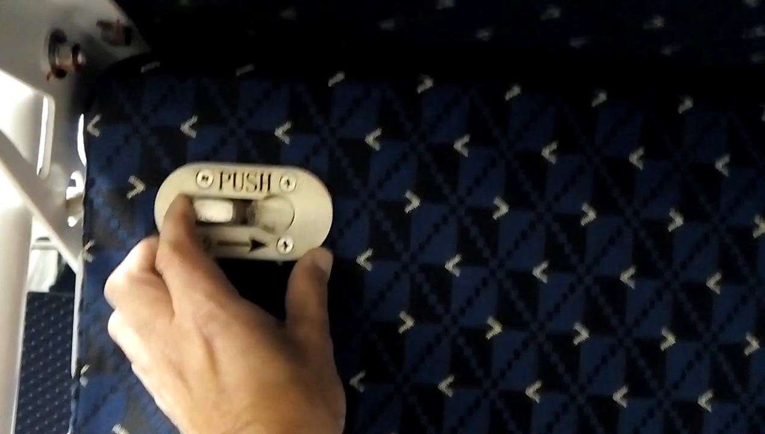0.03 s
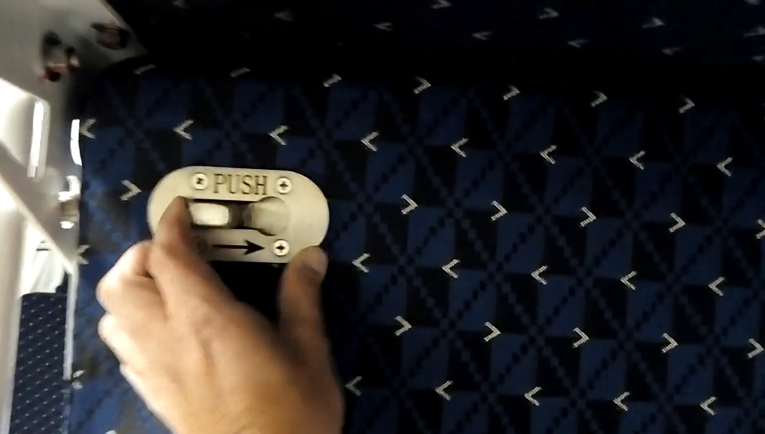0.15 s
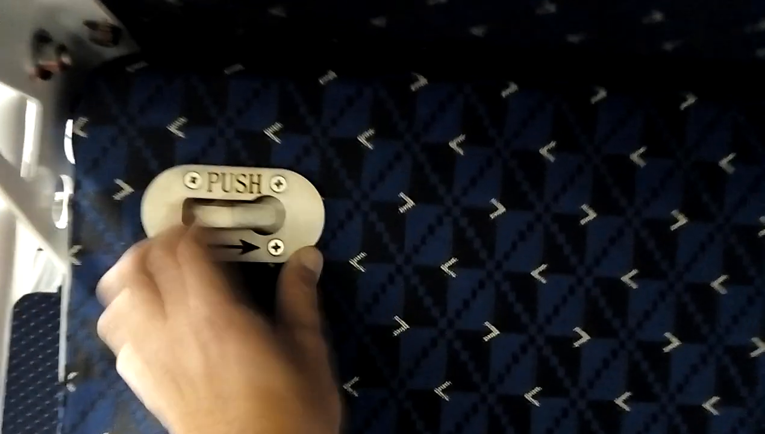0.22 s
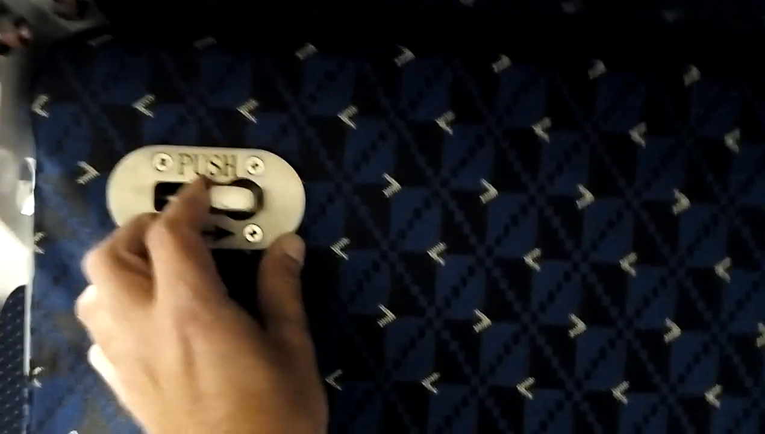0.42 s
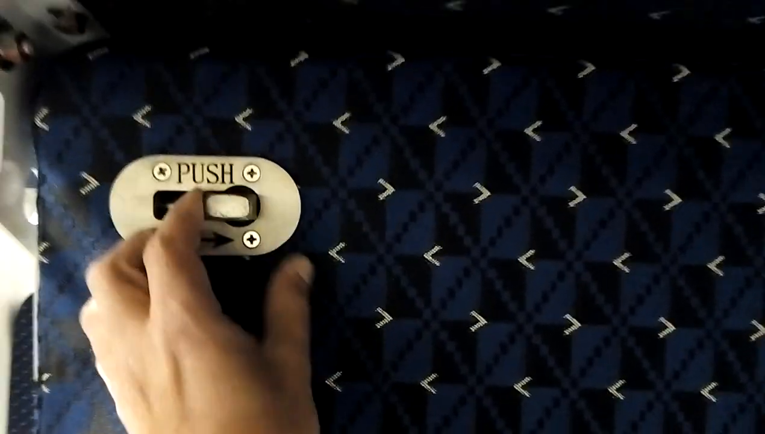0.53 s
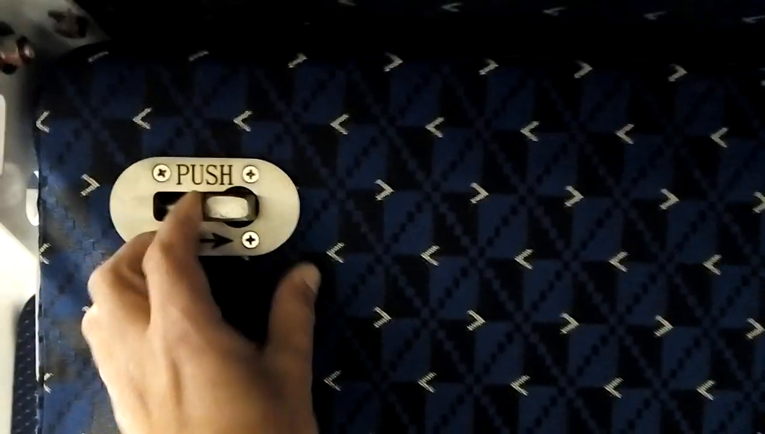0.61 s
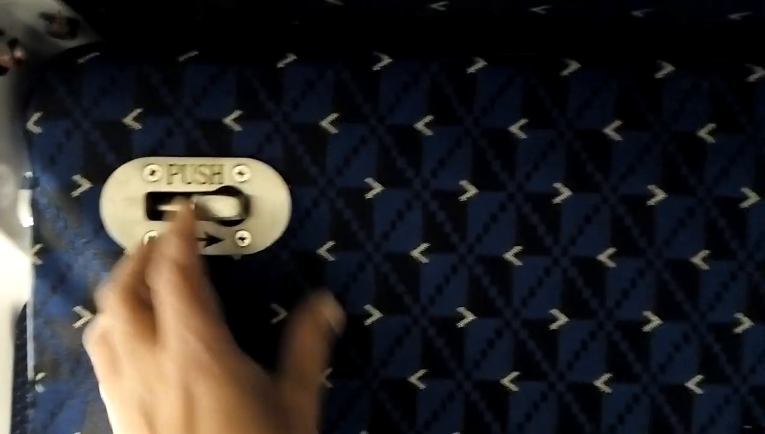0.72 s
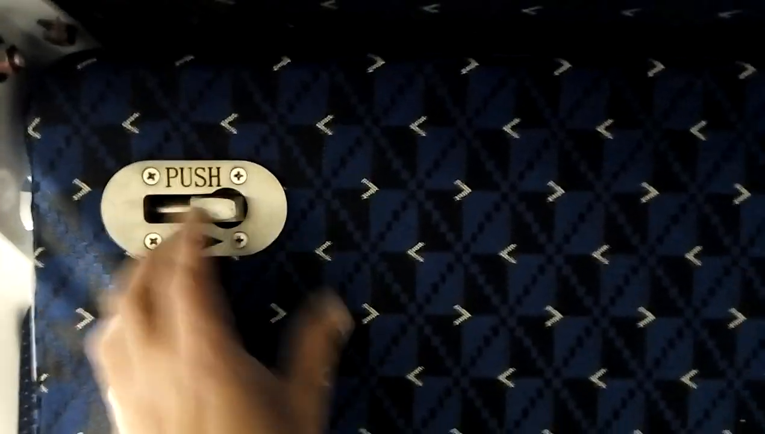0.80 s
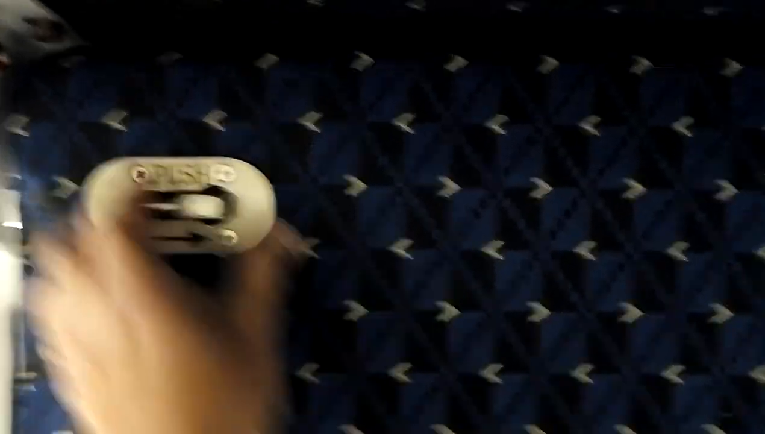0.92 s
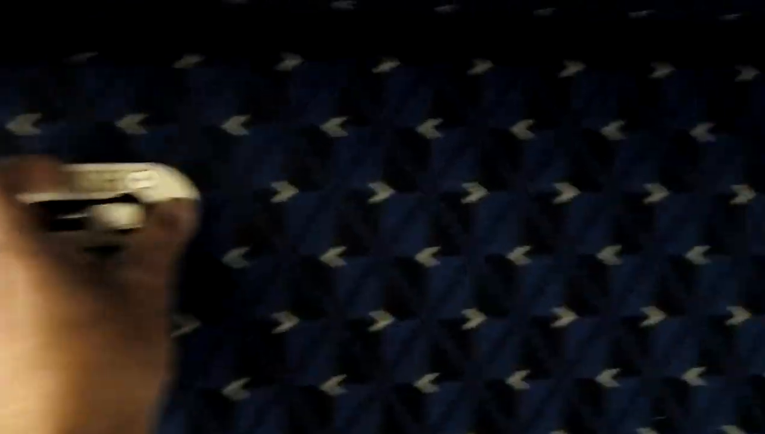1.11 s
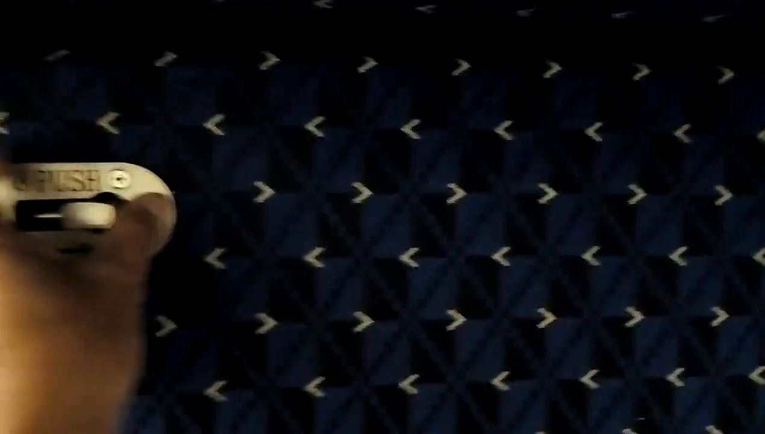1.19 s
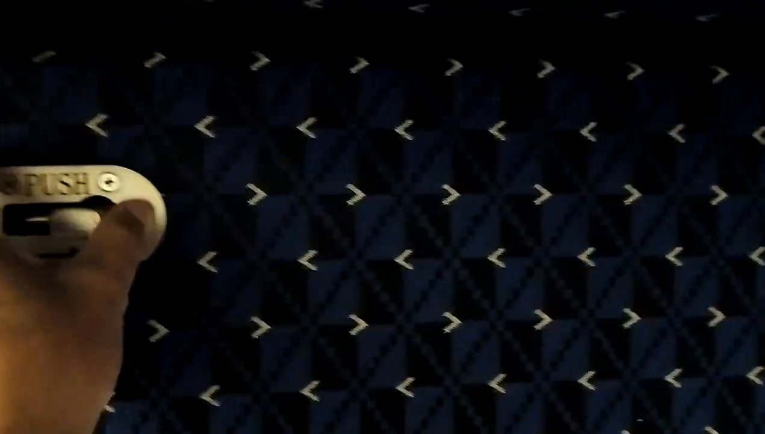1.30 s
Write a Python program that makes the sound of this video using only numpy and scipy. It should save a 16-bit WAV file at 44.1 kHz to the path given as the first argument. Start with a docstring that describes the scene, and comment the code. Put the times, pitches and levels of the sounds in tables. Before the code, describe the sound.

A table latch clacks sharply twice, close to the microphone, after a brief scrape. Faint finger rubbing leads to a softer clatter with a low thud and thin squeak, then one last click. The train carriage's ventilation hums faintly throughout.

```python
"""Ventilation hums faintly in a train carriage from start to end. A hand slides the latch of a fold-down
plastic table on a seat: the bolt scrapes, then snaps over at about 0.24 s with a double clack that rings
the table and shakes the seat, and settles. Fingers brush softly over the latch plate and the fabric.
From about 0.9 s a softer, diffuse clatter with a low thud and a thin squeak sounds in the carriage.
Near the end, at about 1.3 s, the latch clicks once more."""
import sys
import numpy as np
from scipy import signal
from scipy.fft import rfft, irfft, next_fast_len
from scipy.io import wavfile
from scipy.ndimage import map_coordinates

SR = 44100
rng = np.random.default_rng(int(sys.argv[2]) if len(sys.argv) > 2 else 0)


def materialize(psi):
    """Save the field psi as 16-bit PCM at rate SR to the path in sys.argv[1].

    A 1-D psi becomes a single channel; in a 2-D psi each row is a channel.
    """
    bounded = np.clip(np.atleast_2d(psi).T, -1, 1)
    quanta = np.round(bounded * 32767).astype(np.int16)
    wavfile.write(sys.argv[1], SR, quanta)


N = 59535  # 1.35 seconds


def amp(db):
    """Turn decibels into a number to multiply by."""
    return 10 ** (np.asarray(db) / 20)


def unit_rms(x):
    """Scale a lasting sound so that its average power is 1."""
    return x / np.sqrt(np.mean(x ** 2) + 1e-20)


def unit_energy(x):
    """Scale a short sound so that its total energy is 1."""
    return x / np.sqrt(np.sum(x ** 2) + 1e-20)


def read_curve(points, hz):
    """Read between (Hz, value) points, giving every octave the same room."""
    pitches, values = np.transpose(points)
    return np.interp(np.log(hz + 1), np.log(pitches + 1), values)


def clock():
    """The time of every sample, in seconds."""
    return np.arange(N) / SR


def fade(fade_s):
    """Die away. A fade time, here and below, is how long a sound takes to drop by 60 dB."""
    return np.exp(-np.log(1000) * clock() / fade_s)


def swell(rise_s):
    """A soft start that climbs from 0 towards 1."""
    return 1 - np.exp(-clock() / rise_s)


def at(start_s, x):
    """Delay a sound so that it begins at start_s."""
    return np.pad(x, (max(round(start_s * SR), 0), 0))[:N]


def wobble(per_second):
    """A smooth curve through this many random values a second."""
    return map_coordinates(rng.standard_normal(int(N * per_second / SR) + 4), [clock() * per_second])


def colour(x, points, low_hz=1, high_hz=SR):
    """Make some pitches louder than others by (Hz, dB) points, and soften those outside the two edges."""
    size = 2 * next_fast_len(N)
    hz = np.fft.rfftfreq(size, 1 / SR)
    edge_loss = np.sqrt((1 + (low_hz / (hz + 1)) ** 6) * (1 + (hz / high_hz) ** 6))
    gain = amp(read_curve(points, hz)) / edge_loss
    # Folding the cepstrum onto its first half keeps the filter from sounding before it is struck.
    cepstrum = irfft(np.log(np.maximum(gain, 1e-6)), size)
    cepstrum[1:size // 2] *= 2
    cepstrum[size // 2 + 1:] = 0
    return irfft(rfft(x, size) * np.exp(rfft(cepstrum)), size)[:N]


def noise(points):
    """Noise coloured by (Hz, dB) points, with an average power of 1."""
    return unit_rms(colour(rng.standard_normal(N), points))


def level(points):
    """A volume that follows (seconds, dB) points and is silent before and after them."""
    times, db = np.transpose(points)
    return amp(np.interp(clock(), times, db, left=-120, right=-120))


def ringing_tone(hz, fade_s):
    """One pure tone of a struck object, dying away."""
    return np.sin(2 * np.pi * (hz * clock() + rng.random())) * fade(fade_s)


# The colour of the moving air. Each row: frequency in Hz, relative level in dB.
AIR_COLOUR = [(15, -73), (25, -48), (103, -15), (167, -17.5), (202, -8), (257, -12.5), (293, -15.5),
              (558, -15), (604, -10.5), (811, -16.5), (1000, -18), (1090, -7.5), (1540, -2.5), (1760, -8.5),
              (2240, -6.5), (5570, -15.5), (8320, -44), (13500, -38.5), (15000, -34)]
# The tones of the fan. Each row: pitch in Hz, relative level in dB.
FAN_TONES = [(597.5, -82), (1055, -78), (1448, -76.5), (1577, -70)]
def ventilation(air_db=-59.5, waver_db=0.35, duct_db=-6.5, fan_trim_db=-1.5, drift_radians=1.3):
    """Air rushes steadily and rings faintly in its duct, while the fan's tones waver."""
    air = noise(AIR_COLOUR)
    duct_echo = unit_energy(rng.standard_normal(N) * fade(0.11))
    air_in_duct = irfft(rfft(air) * rfft(duct_echo), N)
    rush = unit_rms(air + amp(duct_db) * air_in_duct)
    fan = np.zeros(N)
    for hz, db in FAN_TONES:
        phase = 2 * np.pi * hz * clock() + drift_radians * wobble(13.63)
        fan += amp(db) * np.sqrt(2) * np.sin(phase)
    return amp(air_db + waver_db * wobble(16)) * rush + amp(fan_trim_db) * fan


# How loud the fingers brush. Each row: time in seconds, level in dB.
BRUSH_LEVELS = [(.36, -66), (.43, -65), (.55, -63.5), (.7, -69), (.92, -69.5), (.95, -54.5), (1.0, -59),
                (1.07, -59), (1.1, -80)]
# The colour of the brushing. Each row: frequency in Hz, relative level in dB.
BRUSH_COLOUR = [(200, -23), (1500, -10.5), (2500, -4.5), (3600, 1.5), (5000, -4), (6500, -11.5),
                (8000, -31)]
def fingers():
    """Fingers brush softly over the latch plate and the fabric."""
    return level(BRUSH_LEVELS) * noise(BRUSH_COLOUR)


# How loud the thud and the squeak are. Each row: time in seconds, level in dB.
THUD_LEVELS = [(1.08, -83), (1.105, -50), (1.145, -48), (1.175, -54.5), (1.27, -73)]
SQUEAK_LEVELS = [(1.079, -90), (1.085, -56.5), (1.1, -60), (1.106, -72), (1.112, -56), (1.122, -85)]
# Knocks in the carriage. Each row: start in seconds, level in dB, rise time and fade time in seconds,
# low edge and high edge in Hz.
CLATTER_KNOCKS = [(.934, -22.5, 0.0043, 0.26, 607, 8000), (1.0744, -4, 0.0029, 0.49, 756, 8600),
                  (1.149, -6.5, 0.0019, 0.23, 396, 8500)]
# The colours of the thud, the knocks and the bright hiss (which the latch also uses).
# Each row: frequency in Hz, relative level in dB.
LOW_THUD_COLOUR = [(30, -19), (80, -17), (125, -7.5), (210, 5), (300, -8.5), (550, -3.5), (900, -7),
                   (2500, -39.5)]
CLATTER_COLOUR = [(100, -21), (400, -6.5), (800, -5.5), (1300, -12), (2300, -6.5), (3500, -2), (6200, -7),
                  (8000, -22.5), (12000, -43), (15000, -40)]
HISS_COLOUR = [(5000, -35), (9500, 1.5), (12500, -15), (15000, 2.5)]
def clatter(squeak_hz=9080, hiss_db=-24):
    """Three blurred knocks sound with a low thud and a thin squeak; a bright hiss tops the last knock."""
    thud = level(THUD_LEVELS) * noise(LOW_THUD_COLOUR)
    knocks = np.zeros(N)
    for start_s, db, rise_s, fade_s, low_hz, high_hz in CLATTER_KNOCKS:
        burst = rng.standard_normal(N) * swell(rise_s) * fade(fade_s)
        knocks += at(start_s, amp(db) * unit_energy(colour(burst, CLATTER_COLOUR, low_hz, high_hz)))
    squeak_phase = 2 * np.pi * squeak_hz * clock() + 0.9 * wobble(200)
    squeak = level(SQUEAK_LEVELS) * unit_rms(np.sin(squeak_phase))
    hiss = unit_energy(noise(HISS_COLOUR) * fade(0.14) * swell(0.004))
    return thud + knocks + squeak + at(1.149, amp(hiss_db) * hiss)


# The colour of the shaking seat. Each row: frequency in Hz, relative level in dB.
SEAT_COLOUR = [(25, -18), (70, -8.5), (170, -1.5), (300, -3.5), (600, -34), (2000, -65)]
def seat(start_s=0.243, db=-27):
    """The seat back gives a faint, low shudder under the main clack."""
    shudder = unit_energy(noise(SEAT_COLOUR) * fade(0.3) * swell(0.003))
    return at(start_s, amp(db) * shudder)


# The tones of the bolt's tick. Each row: pitch in Hz, level in dB, fade time in seconds.
TICK_TONES = [(480, -48.5, 0.067), (3460, -37.5, 0.014), (3720, -42, 0.015)]
# How loud the bolt scrapes. Each row: time in seconds, level in dB.
SLIDE_LEVELS = [(.14, -60), (.17, -56), (.2, -54.5), (.214, -47), (.231, -37.5), (.24, -64)]
# The colour of the scraping. Each row: frequency in Hz, relative level in dB.
SLIDE_COLOUR = [(100, -15), (450, 0.5), (900, -11.5), (1500, -6), (3500, -0.5), (6000, -12), (8000, -49),
                (15000, -38)]
def bolt(unstuck_s=0.168, rough_db=3):
    """The bolt comes unstuck with a tick and scrapes unevenly along its slot."""
    tick = swell(0.00086) * sum(amp(db) * ringing_tone(hz, fade_s) for hz, db, fade_s in TICK_TONES)
    scrape = unit_rms(noise(SLIDE_COLOUR) * amp(rough_db * wobble(293.3)))
    return at(unstuck_s, tick) + level(SLIDE_LEVELS) * scrape


# How long the carriage echoes. Each row: frequency in Hz, fade time in seconds when length is 1.
ECHO_FADES = [(150, 0.72), (500, 0.097), (2500, 0.18), (6000, 0.17), (14000, 0.11)]
def carriage_echo(length):
    """The carriage throws back a blur of echoes in which the deep bass lasts longest."""
    hz, times, spectrum = signal.stft(rng.standard_normal(N), SR, nperseg=256)
    fade_s = length * read_curve(ECHO_FADES, hz)
    fading = np.exp(-np.log(1000) * times / fade_s[:, None])
    echo = signal.istft(spectrum * fading, SR, nperseg=256)[1][:N]
    return unit_energy(echo * swell(0.0016))


# The tones at which the plastic table rings. Each row: pitch in Hz, relative level in dB.
TABLE_TONES = [(1206, -9), (1334, -8), (1425, -13), (1538, 1), (1935, -0.5), (2074, 2.5), (2147, -5),
               (2226, 0), (2274, -0.9), (2635, -1), (2787, 3), (3545, 0.5), (3608, 4.5), (3698, 2.5),
               (3758, 2.5), (3977, 2), (4461, -2.5), (4573, -4)]
def table_ring(length, full_fade_s=0.14, spring_hz=5227, spring_db=-15.5):
    """A hit rings the table, with a slightly different mix of tones each time, and the latch spring."""
    chance_db = rng.standard_normal(len(TABLE_TONES))
    panel = sum(amp(db + extra_db) * ringing_tone(hz, length * full_fade_s)
                for (hz, db), extra_db in zip(TABLE_TONES, chance_db))
    spring = ringing_tone(spring_hz, fade_s=0.24)
    return (unit_energy(panel) + amp(spring_db) * unit_energy(spring)) * swell(0.0011)


# The hits of the latch. Each row: start in seconds, level in dB, then the gains in dB of table ring,
# carriage echo and bright hiss within that hit, low edge and high edge in Hz, and a length from 0 to 1
# that scales the fade times of table and echo.
LATCH_HITS = [(.158, -29.5, -17, -17, -47, 1200, 6000, .8), (0.2313, 7.5, -14, -6.5, -61, 116, 7400, 0.42),
              (0.2414, -0.5, -6, -20, -40, 895, 4800, 0.4), (.2430, 9, -3, -1, -30.5, 303, 8000, 1),
              (0.2579, -7, 0.5, 4.5, -34, 1130, 7200, 0.99), (0.279, -15, -2, 2, -50, 1520, 3720, 0.2),
              (.322, -14.5, 1, 4.5, -56, 160, 3830, 0.1), (.3265, -14, 0.5, 4, -53, 880, 3270, 0.68),
              (1.3358, -9.5, -5, -2.5, -54, 1330, 3900, 0.6)]
# The colour of a hit on plastic. Each row: frequency in Hz, relative level in dB.
PLASTIC_COLOUR = [(24, -64), (40, -25), (188, -33), (371, -10.5), (573, -17.5), (1400, -1.5), (1790, -9.5),
                  (1970, -2.5), (2700, -3), (3120, -5.5), (3690, -2), (4170, -8.5), (4590, -3.5),
                  (4940, -12.5), (5990, -6), (6760, -18), (13000, -48)]
def latch(rise_s=0.0004, chatter_fade_s=0.017, echo_low_hz=498):
    """Each hit is a snap with a brief chatter; it rings the table and echoes in the carriage."""
    out = np.zeros(N)
    for start_s, db, ring_db, echo_db, hiss_db, low_hz, high_hz, length in LATCH_HITS:
        chatter = unit_energy(rng.standard_normal(N) * fade(chatter_fade_s) * swell(rise_s))
        snap = at(rise_s, 0.43 * signal.unit_impulse(N))
        crack = snap + amp(3) * chatter
        clack = unit_energy(colour(crack, PLASTIC_COLOUR, low_hz, high_hz))
        raw_echo = carriage_echo(length)
        # The carriage returns little of the hollow, low part of the knock.
        echo = unit_energy(colour(raw_echo, PLASTIC_COLOUR, max(low_hz, echo_low_hz), high_hz))
        ring = colour(table_ring(length), [(1, 0.015)], low_hz, high_hz)  # flat between the edges
        hiss = unit_energy(colour(crack + 0.94 * raw_echo, HISS_COLOUR))
        hit = clack + amp(ring_db) * ring + amp(echo_db) * echo + amp(hiss_db) * hiss
        out += at(start_s, amp(db) * hit)
    return out


def scene():
    """All the sounds add up in one channel."""
    return (latch() + bolt() + seat() + clatter() + fingers() + ventilation())[None]


def record(dry):
    """Cut away the very highest treble."""
    top_hz = 15600
    size = 2 * next_fast_len(N)
    kept = np.fft.rfftfreq(size, 1 / SR) < top_hz
    return irfft(rfft(dry, size) * kept, size)[:, :N]


dry = scene()
out = record(dry)
materialize(out)
```